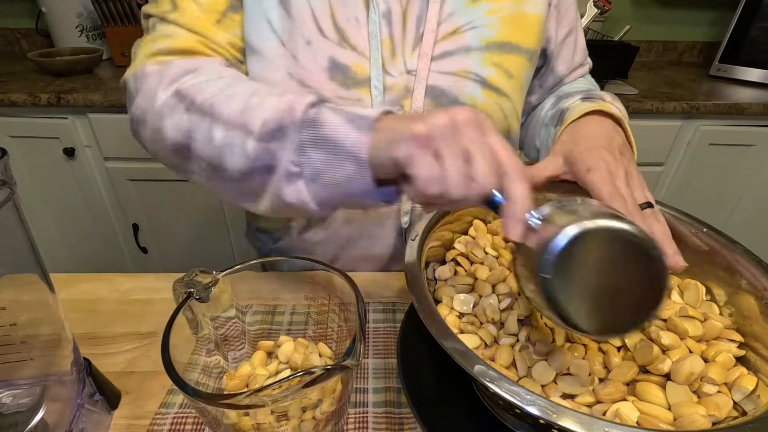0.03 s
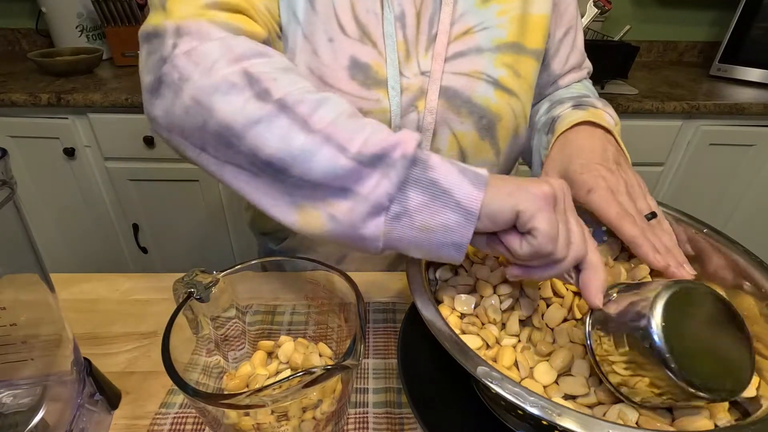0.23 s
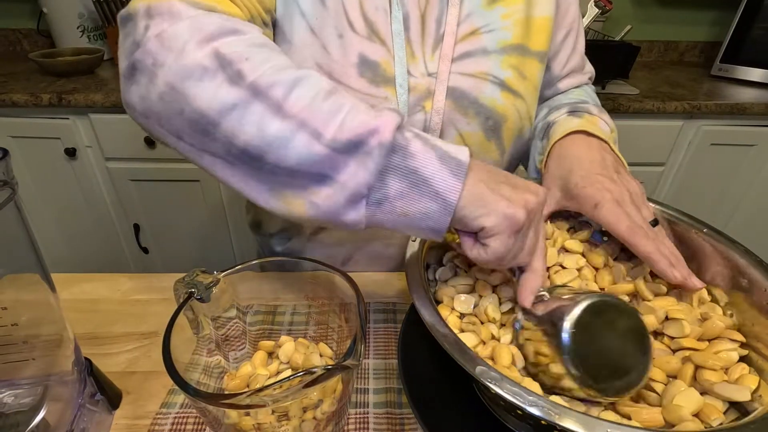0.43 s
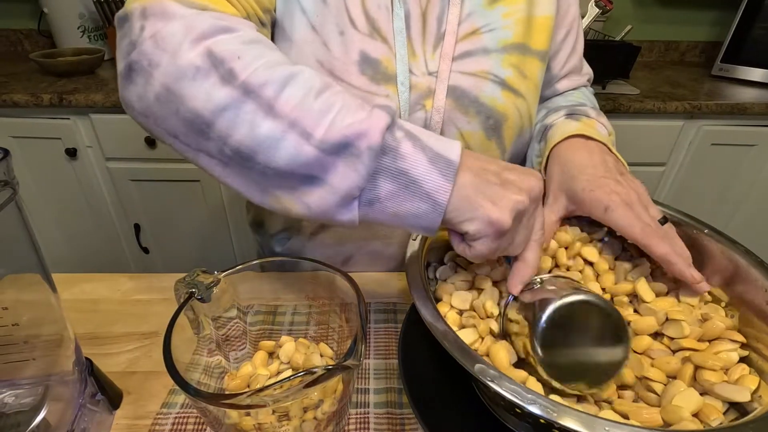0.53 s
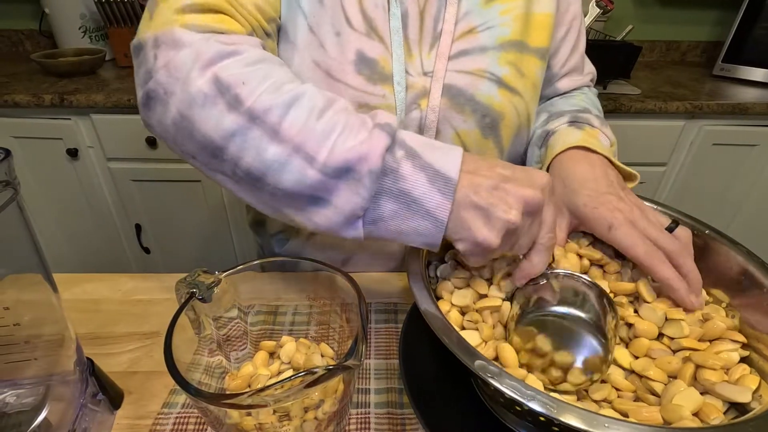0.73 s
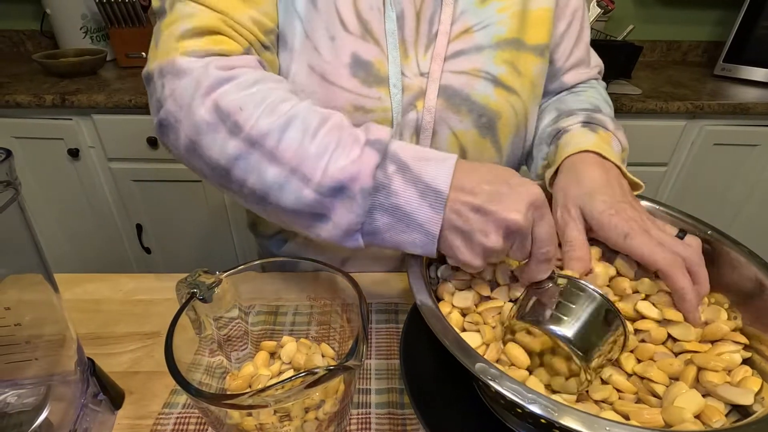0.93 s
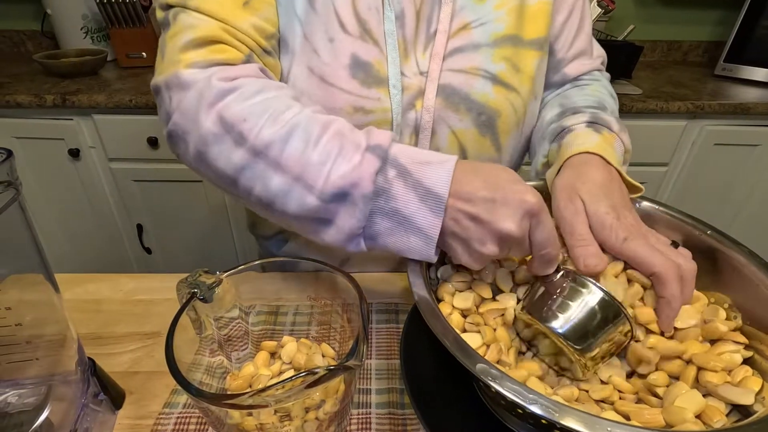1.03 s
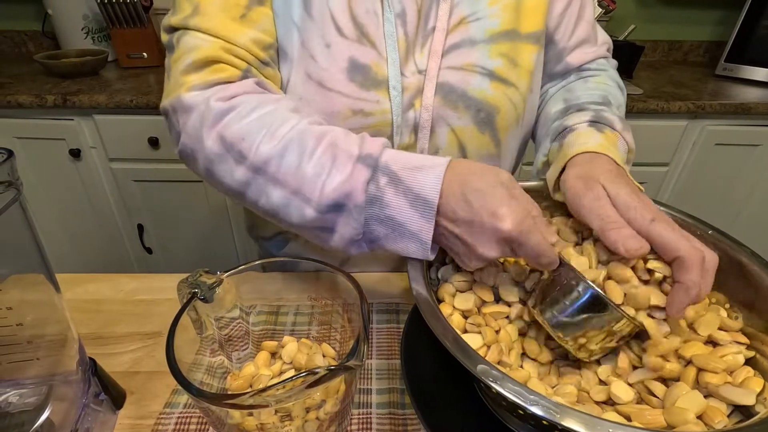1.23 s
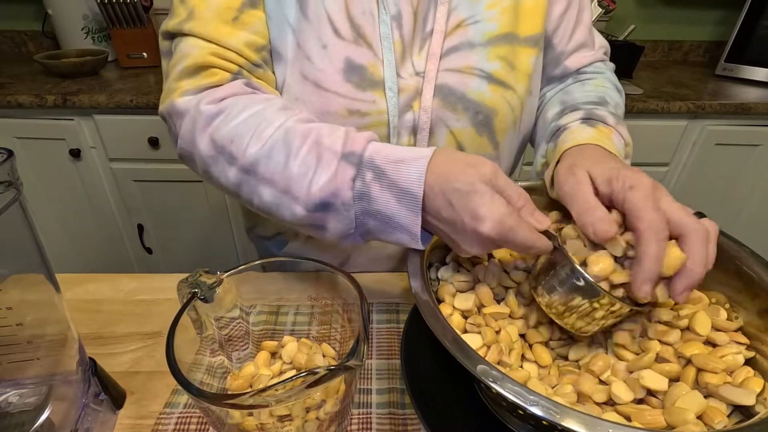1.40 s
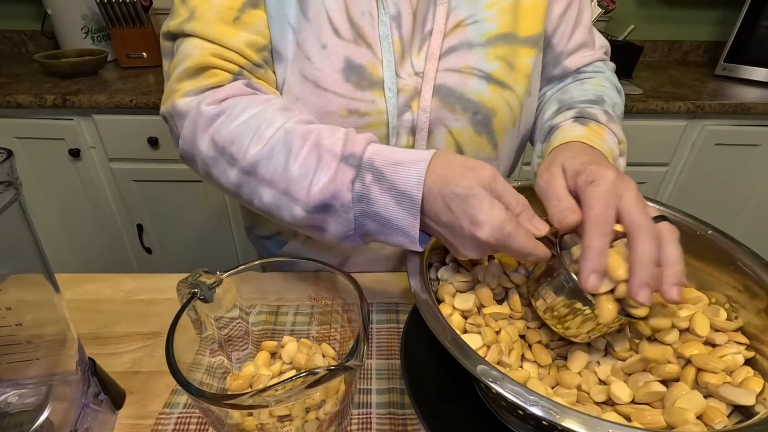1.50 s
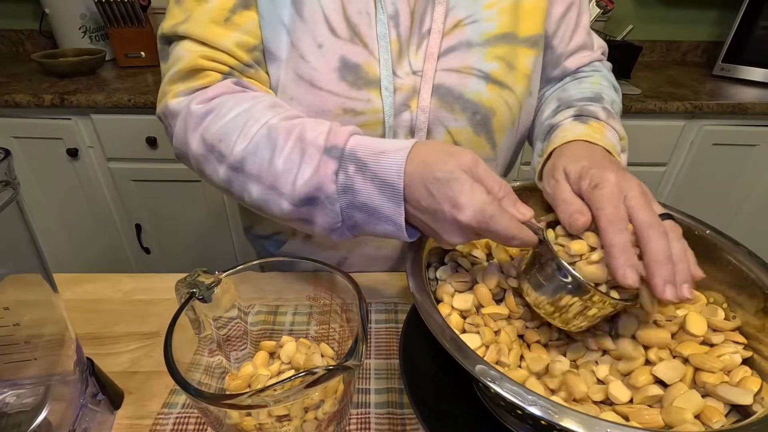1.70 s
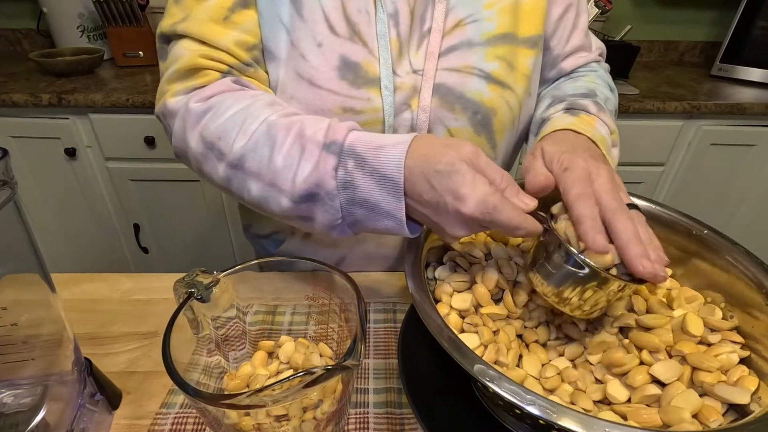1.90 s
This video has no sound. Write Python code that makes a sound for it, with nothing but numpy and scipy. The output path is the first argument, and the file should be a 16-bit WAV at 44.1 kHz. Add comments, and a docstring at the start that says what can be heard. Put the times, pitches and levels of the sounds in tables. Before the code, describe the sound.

Close up in a small, quiet kitchen, a metal cup scoops hard nuts from a steel bowl. Clanks, hollow knocks and dull bumps come first, then lighter clicking and rustling as a hand fills the cup.

```python
"""Clanks and hollow knocks: a steel measuring cup is pushed mouth down into a steel bowl of shelled
acorns, then turned over and filled by hand. Cup and bowl ring on contact. Nuts knock on the cup,
whose hollow sounds low and long while it faces down, higher and shorter once turned.
The heap clacks, rustles and bumps the bowl on the counter, in a small quiet kitchen."""
import sys
import numpy as np
from scipy import signal
from scipy.io import wavfile

SR = 44100
rng = np.random.default_rng(int(sys.argv[2]) if len(sys.argv) > 2 else 0)


def wav_record(signal):
    """Record a signal, one row per channel, as 16-bit PCM in the file named by sys.argv[1]."""
    frames = np.transpose(np.atleast_2d(signal))
    bounded = np.clip(frames, -1, 1)
    # unit amplitude maps onto the largest positive 16-bit level
    quanta = np.round(bounded * 32767).astype(np.int16)
    wavfile.write(sys.argv[1], SR, quanta)


N = 85995
TURN_S = .95  # the cup is turned over


def amp(db):
    """Decibels to gain."""
    return 10 ** (np.asarray(db) / 20)


def at_hz(points, hz):
    """Interpolates (Hz, value) points on a log-frequency axis."""
    point_hz, value = np.transpose(points)
    return np.interp(np.log(hz + 1), np.log(point_hz + 1), value)


def add(mix, start_s, sound):
    """Mixes a sound in at start_s."""
    part = mix[round(start_s * SR):][:len(sound)]
    part += sound[:len(part)]


def colour(x, spectrum):
    """Minimum-phase filter from (Hz, dB) points."""
    size = 4096
    log_gain = np.log(amp(at_hz(spectrum, abs(np.fft.fftfreq(size, 1 / SR)))))
    taps = np.fft.ifft(np.exp(np.conj(signal.hilbert(log_gain)))).real[:size // 2]
    return signal.fftconvolve(x, taps)[:len(x)]


def fade(t, t60_s):
    """Exponential decay."""
    return np.exp(-np.log(1000) * t / t60_s)


def rise(t, rise_s=.00071):
    """Exponential attack."""
    return 1 - np.exp(-t / rise_s)


def swell(t, peak_s):
    """Rounded rise to 1, quick fall."""
    return (t / peak_s * np.exp(1 - t / peak_s)) ** 2.9


# Background spectrum. Each row: frequency in Hz, gain in dB.
FLOOR_SPECTRUM = [(30, -42), (105, -47.5), (135, -24.5), (162, -6), (215, -8.5), (310, -12.5), (480, -17.5),
                  (600, -17), (800, -24.5), (1900, -25), (3200, -27.5), (5500, -35.5), (7500, -42),
                  (9000, -65), (11000, -47), (13000, -69)]


def room_tone():
    """The kitchen's steady, faint noise."""
    noise = colour(rng.standard_normal(N + SR), FLOOR_SPECTRUM)[SR:]
    return amp(-56.5) * noise / np.sqrt(np.mean(noise ** 2))


# Room decay. Each row: frequency in Hz, T60 in seconds.
ROOM_DECAY = [(150, 0.26), (1000, 0.28), (4000, 0.43), (12000, 0.2)]


def kitchen_reverb(x):
    """Short diffuse tail, each band dying at its own rate."""
    size = SR // 2
    noise = rng.standard_normal(size) * (np.arange(size) > .005 * SR)
    hz, t, bands = signal.stft(noise, SR, nperseg=256)
    tail = signal.istft(bands * fade(t, at_hz(ROOM_DECAY, hz)[:, None]), SR)[1]
    return signal.fftconvolve(x, tail / np.linalg.norm(tail))[:N]


def collisions(gain, spectrum, per_s=1500):
    """Tiny random impacts of uneven size, sharing one spectrum; gain sets their rms."""
    size = amp(3.5 * np.minimum(rng.exponential(1, N), 4))
    train = size * rng.choice([-1., 1.], N) * (rng.random(N) < per_s / SR)
    return colour(train * gain, spectrum) / np.std(colour(train, spectrum))


# Steady stirring. Each row: time in seconds, relative hollow and rustle levels in dB.
STIRRING = [(.208, -22.5, -112), (.26, -44, -63), (.36, -34.5, -55), (.7, -36, -62), (.91, -46, -56),
            (1.04, -35.5, -69), (1.25, -37, -58.5), (1.38, -48.5, -58.5), (1.445, -49.5, -74),
            (1.475, -38.5, -60.5), (1.6, -35.5, -57.5), (1.77, -41, -57), (1.95, -37, -52)]
# Shoves of cup and hand. Each row: centre and half length in seconds, relative bass, body and
# crunch levels in dB.
HEAP_SHOVES = [(0.251, 0.033, -48, -43.5, -39), (0.419, 0.018, -46.5, -37, -33.5),
               (0.451, 0.017, -48, -37, -69), (0.53, 0.041, -50.5, -42, -51.5),
               (0.628, 0.031, -49, -38.5, -47), (0.76, 0.032, -61, -42.5, -38.5),
               (1.004, 0.048, -60.5, -51.5, -49.5), (1.067, 0.041, -62, -38.5, -46.5),
               (1.204, 0.03, -62, -46, -46), (1.289, 0.0081, -64, -43.5, -78),
               (1.601, 0.023, -91, -58, -49.5), (1.713, 0.012, -83, -66, -53),
               (1.818, 0.049, -74, -68, -49.5), (1.926, 0.045, -74, -62, -47)]
# Spectra of the nuts, the bowl's base and the turned cup. Each row: frequency in Hz, gain in dB.
RUSTLE_SPECTRUM = [(300, 9.5), (1050, 29.5), (1600, 11.5), (2300, 20.5), (3500, 5.5), (4200, 2.5),
                   (7300, -0.5), (9000, -11.5), (11000, -20), (12500, -15), (15000, -40)]
CRUNCH_SPECTRUM = [(300, -13.5), (1500, 19), (2400, 10), (4500, 5.5), (7300, -3.5), (9000, -16),
                   (11000, -12.5), (15000, -56.5)]
BASS_SPECTRUM = [(25, -30), (50, -20.5), (82, 10), (108, 7.5), (135, 11), (170, 12), (300, -42.5)]
BODY_SPECTRUM = [(90, -26.5), (130, -7), (178, 3), (240, 0), (310, -2.5), (385, 9), (470, 0), (600, -11),
                 (1200, -38.5)]
HOLLOW_SPECTRUM = [(300, -54), (620, -9.5), (860, 4), (1000, -2.5), (1065, 13.5), (1135, 1.5), (1300, -6.5),
                   (1500, -10), (2500, -47), (5000, -50)]
# Facing down, the wall's lowest mode lifts one note and cuts just above it.
# Each row: frequency in Hz, gain in dB.
WALL_SPECTRUM = [(840, 0.5), (905, -4), (946, 4.5), (985, -3), (1050, -17), (1350, 1.5)]


def heap():
    """Countless small collisions sound in the cup, among the nuts and through the bowl's base."""
    t = np.arange(N) / SR
    times_s, *curves_db = np.transpose(STIRRING)
    in_cup, stir = (amp(np.interp(t, times_s, db, left=-np.inf)) for db in curves_db)
    bass_gain, body_gain, crunch_gain = sum(
        np.outer(amp(levels_db), np.exp(-((t - centre_s) / half_s) ** 2))
        for centre_s, half_s, *levels_db in HEAP_SHOVES)
    lowered = [(.885 * hz, db) for hz, db in HOLLOW_SPECTRUM]
    down = colour(collisions(in_cup * (t <= TURN_S), lowered), WALL_SPECTRUM)
    turned = collisions(in_cup * (t > TURN_S), HOLLOW_SPECTRUM)
    rustle = amp(6.5) * collisions(stir, RUSTLE_SPECTRUM)
    crunch = amp(-1.5) * collisions(crunch_gain, CRUNCH_SPECTRUM, per_s=670)
    bass = amp(-1.5) * collisions(bass_gain + amp(-18.5) * stir, BASS_SPECTRUM)
    body = amp(-4.5) * collisions(body_gain + amp(7.5) * stir, BODY_SPECTRUM)
    return amp(-9) * (down + turned) + rustle + crunch + bass + body


# Steel rubs. Each row: start in seconds, level in dB, pitch in Hz, relative octave level in dB.
STEEL_RUBS = [(0.59, -43.5, 4710, -9)]


def squeak():
    """Steel rubbing on steel: a tiny tone and its octave."""
    out, t = np.zeros(N), np.arange(SR // 16) / SR
    for start_s, db, hz, octave_db in STEEL_RUBS:
        phase = 2 * np.pi * hz * t
        tone = np.sin(phase) + amp(octave_db) * np.sin(2 * phase)
        add(out, start_s, amp(db) * swell(t, peak_s=.0044) * tone)
    return out


def burst(t60_s, spectrum, centre_hz=None):
    """Decaying micro-contacts, optionally through one broad resonance."""
    t = np.arange(SR // 4) / SR
    envelope = rise(t, rise_s=.001) * fade(t, t60_s)
    x = colour(envelope * rng.choice([-1., 1.], len(t)), spectrum)
    if centre_hz:
        x = signal.lfilter(*signal.iirpeak(centre_hz, Q=4.2, fs=SR), x)
    return x / np.linalg.norm(x) * np.linalg.norm(envelope / envelope.max()) / np.sqrt(2)


# Nut ticks. Each row: start in seconds, level in dB.
NUT_TICKS = [(0.121, -55.5), (0.221, -39), (0.268, -34.5), (0.3395, -40), (0.383, -42.5), (0.414, -42),
             (.421, -38), (0.437, -35), (0.5104, -42), (0.532, -37.5), (0.608, -40), (0.619, -38),
             (0.636, -41), (0.733, -39), (0.7481, -30), (0.8391, -41), (0.92, -51.5), (0.945, -46.5),
             (0.999, -39), (1.023, -34.5), (1.039, -39), (1.063, -37), (1.361, -46.5), (1.458, -49),
             (1.614, -46), (1.711, -47), (1.722, -43.5), (1.836, -46.5), (1.939, -51)]
# Tick spectrum. Each row: frequency in Hz, gain in dB.
TICK_SPECTRUM = [(300, -34), (2000, 5), (4500, 8), (7300, 1), (9000, -14.5), (11500, -11.5), (15000, -30)]


def ticks():
    """Dry nuts tick brightly on steel."""
    out = np.zeros(N)
    for start_s, db in NUT_TICKS:
        add(out, start_s, amp(db) * burst(t60_s=.014, spectrum=TICK_SPECTRUM))
    return out


# Nut clacks. Each row: start in seconds, level in dB, centre in Hz, T60 in seconds.
NUT_CLACKS = [(.2188, -22.5, 2930, 0.035), (0.2434, -21.5, 2770, 0.037), (0.258, -25.5, 2680, 0.043),
              (.267, -23, 1760, 0.14), (.331, -28, 1790, 0.0083), (0.3407, -39, 3880, 0.023),
              (0.417, -25.5, 2460, 0.019), (0.4313, -22, 3300, 0.012), (0.489, -34, 2700, 0.053),
              (0.6184, -24.5, 2610, 0.022), (0.637, -50, 4100, 0.072), (0.647, -31.5, 2440, 0.016),
              (0.723, -31, 4750, 0.1), (.748, -18, 2330, 0.035), (.752, -29.5, 2210, 0.12),
              (1.032, -27.5, 2180, 0.053), (1.035, -27.5, 2810, 0.036), (1.061, -27, 3530, 0.021),
              (1.074, -36.5, 2260, 0.075), (1.129, -35, 2330, 0.051), (1.142, -29, 2250, 0.0097),
              (1.228, -35.5, 2240, 0.069), (1.3028, -35.5, 2800, 0.019), (1.333, -37, 2600, 0.014),
              (1.361, -38, 2450, 0.014), (1.372, -41.5, 2350, 0.04), (1.461, -42.5, 1970, 0.05),
              (1.614, -41, 2340, 0.043), (1.6593, -27.5, 2400, 0.015), (1.661, -28, 3230, 0.0084),
              (1.715, -31, 2450, 0.025), (1.793, -33.5, 2530, 0.018), (1.8153, -37, 1940, 0.089),
              (1.837, -34, 2730, 0.015), (1.937, -30.5, 1690, 0.025)]
# Clack spectrum. Each row: frequency in Hz, gain in dB.
CLACK_SPECTRUM = [(100, -25), (500, 10), (800, 17.5), (3500, 1), (4400, -6.5), (7000, -12.5), (10000, -30),
                  (15000, -30)]


def clacks():
    """Hard hits and short scrapes of nuts and cup."""
    out = np.zeros(N)
    for start_s, db, centre_hz, t60_s in NUT_CLACKS:
        add(out, start_s, amp(db) * burst(t60_s, CLACK_SPECTRUM, centre_hz))
    return out


# Steel modes. Each row: frequency in Hz, gain in dB, T60 in seconds.
CUP_MODES = [(945, -1, .35), (1911, -4, .5), (1972, -5, .45), (2867, -8, .14), (2926, -11, .12),
             (3290, -12, .16), (3533, -2, .34)]
BOWL_MODES = [(392, -5, .3), (888, -4, .5), (1297, -7, .22), (1697, -11, .25), (1755, -8, .28),
              (1912, -10, .3), (2030, -9, .3), (2150, -11, .25), (2313, -8, .22), (2445, 0, .24),
              (2590, -12, .2), (4020, -13, .12), (4373, -10, .1)]
# Steel contacts. Each row: start in seconds, cup, bowl and sheen gains in dB, focus in Hz.
CONTACTS = [(.219, -42.5, -34.5, -54, 2780), (.242, -38, -45, -54.5, 2580), (.268, -27, -38, -49.5, 1760),
            (.419, -28.5, -61, -57, 1930), (.433, -33.5, -47, -63, 3780), (.526, -33.5, -61, -57, 2040),
            (0.617, -61, -42.5, -52.5, 2353), (.724, -57, -29.5, -63, 4400), (.750, -45, -26, -63, 2490),
            (0.9635, -32.5, -68, -57, 3700), (1.038, -36.5, -37, -54, 2660), (1.059, -38.5, -52, -62, 3700),
            (1.661, -43, -48, -85, 3440)]


def clanks():
    """Cup and bowl ring; the contact point favours the modes near its focus."""
    out, t = np.zeros(N), np.arange(SR // 2) / SR
    width_octaves = .57
    for start_s, cup_db, bowl_db, _, focus_hz in CONTACTS:
        damping = fade(t, t60_s=.25) if start_s > TURN_S else 1  # nuts lie in the cup
        for modes, db in ((CUP_MODES, cup_db), (BOWL_MODES, bowl_db)):
            for hz, mode_db, t60_s in modes:
                weight = 1 / (1 + abs(np.log2(hz / focus_hz) / width_octaves) ** 2.16)
                ring = rise(t) * fade(t, t60_s) * np.sin(2 * np.pi * hz * t)
                add(out, start_s, amp(db + mode_db) * weight * damping * ring)
    return out


# The cup's high modes. Each row: frequency in Hz, gain in dB.
SHEEN_MODES = [(3565, 0), (4574, 1), (4910, -2), (5257, -2), (5351, -3), (5502, -3), (7434, -5), (7970, -9),
               (9850, -16)]


def sheen():
    """Each steel contact also rings the thin wall's high modes, in a random mix."""
    out, t = np.zeros(N), np.arange(SR // 3) / SR
    envelope = rise(t) * fade(t, t60_s=.19)
    for start_s, _, _, db, _ in CONTACTS:
        for hz, mode_db in SHEEN_MODES:
            gain = amp(db + mode_db + rng.uniform(-7.5, 2.5))
            add(out, start_s, gain * envelope * np.sin(2 * np.pi * (hz * t + rng.random())))
    return out


# Nuts on the cup. Each row: start in seconds, level in dB, pitch in Hz, time to peak in seconds.
CUP_KNOCKS = [(0.2063, -26.5, 1176, 0.0031), (.216, -26, 936, 0.011), (.242, -20.5, 815, 0.0027),
              (0.25, -17, 924, 0.0053), (.262, -18.5, 927, 0.0063), (0.277, -30, 940, 0.0035),
              (.340, -31, 865, 0.0049), (.383, -22.5, 885, 0.0024), (0.393, -19, 965, 0.0026),
              (0.404, -16, 873, 0.0016), (.410, -13.5, 950, 0.0045), (.421, -13, 882, 0.0028),
              (.432, -14.5, 848, 0.0032), (.4365, -14, 927, 0.0035), (0.4428, -13.5, 930.4, 0.0049),
              (.516, -27, 910, 0.0041), (.528, -17.5, 864, 0.0036), (.538, -20, 931, 0.0049),
              (.596, -27, 905, 0.0043), (.608, -23.5, 890, 0.0042), (.617, -16, 854, 0.0028),
              (0.623, -11.5, 933, 0.0047), (.641, -16, 967, 0.0035), (.683, -30, 927, 0.011),
              (0.721, -29, 909, 0.012), (.748, -20, 927, 0.0023), (.773, -23, 912, .0035),
              (0.782, -20, 967, 0.0018), (0.843, -31, 930, 0.0034), (.879, -29, 840, 0.0053),
              (0.944, -32, 922, 0.0066), (0.965, -12.5, 966, 0.0027), (0.995, -35, 850, .003),
              (1.0045, -20.5, 947, 0.003), (1.013, -19.5, 980, 0.0043), (1.03, -17.5, 1163, 0.0026),
              (1.051, -14.5, 1030, 0.0028), (1.072, -24, 1040, 0.0017), (1.079, -20.5, 987, 0.0033),
              (1.1281, -14, 1137, 0.0019), (1.1389, -21, 1073, 0.0024), (1.219, -25, 1010, 0.0012),
              (1.224, -29.5, 1103, 0.004), (1.317, -28, 1070, 0.0015), (1.322, -32, 1115, 0.0028),
              (1.349, -28.5, 1030, 0.0019), (1.391, -35.5, 1062, 0.0023), (1.530, -27.5, 1026, 0.0018),
              (1.549, -32, 941, 0.0017), (1.589, -29, 1013, 0.0035), (1.597, -26.5, 810, 0.0019),
              (1.614, -31, 1044, 0.0034), (1.660, -26, 990, 0.0023), (1.719, -27, 1001, 0.0013),
              (1.816, -29.5, 1020, 0.0023), (1.827, -26.5, 1140, 0.00079), (1.837, -36, 1070, 0.0032),
              (1.858, -31.5, 1032, 0.0055), (1.937, -23, 1032, 0.0024)]
# The hollow's overtones. Each row: pitch ratio, gain facing down in dB, gain once turned in dB.
HOLLOW_OVERTONES = [(2.03, -41.5, -20.5), (3.1, -37, -31)]


def knocks():
    """Each knock sounds the cup's hollow for a few cycles; facing down, the wall holds the note."""
    down, turned, t = np.zeros(N), np.zeros(N), np.arange(SR // 16) / SR
    for start_s, db, hz, peak_s in CUP_KNOCKS:
        faces_down = start_s < TURN_S
        tone = np.sin(2 * np.pi * hz * t)
        for ratio, down_db, turned_db in HOLLOW_OVERTONES:
            overtone = np.sin(2 * np.pi * (ratio * hz * t + rng.random()))
            tone += amp(down_db if faces_down else turned_db) * overtone
        add(down if faces_down else turned, start_s, amp(db) * swell(t, peak_s) * tone)
    return colour(down, WALL_SPECTRUM) + turned


def scene():
    """The scoop, its reverb and the room tone, in mono."""
    scoop = knocks() + clanks() + sheen() + clacks() + ticks() + squeak() + heap()
    return (room_tone() + scoop + amp(-11.5) * kitchen_reverb(scoop))[None]


def record(dry):
    """Narrow treble notch, falling top, band limit."""
    notch_hz, roll_off_hz, edge_hz = 9100, 11000, 15200
    x = signal.lfilter(*signal.iirnotch(notch_hz, Q=31, fs=SR), dry)
    x = signal.lfilter(*signal.butter(2, roll_off_hz, fs=SR), x)
    band_limit = signal.firwin(511, edge_hz, window=("kaiser", 9), fs=SR)
    return signal.oaconvolve(x, band_limit[None], "same")


dry = scene()
out = record(dry)
wav_record(out)
```